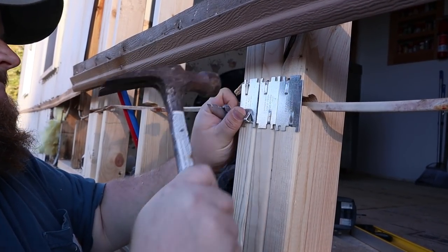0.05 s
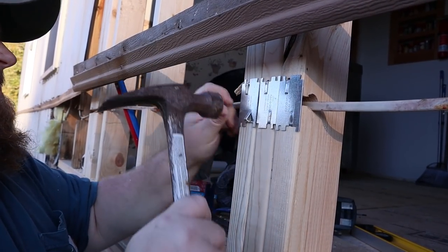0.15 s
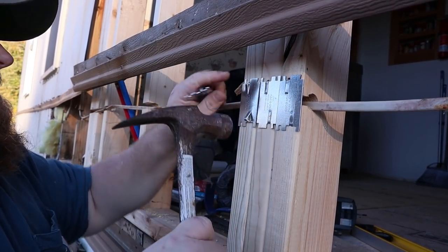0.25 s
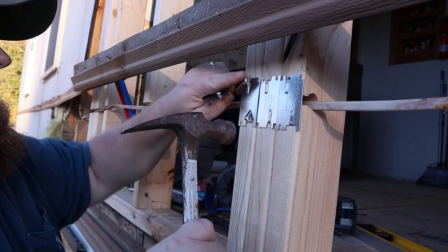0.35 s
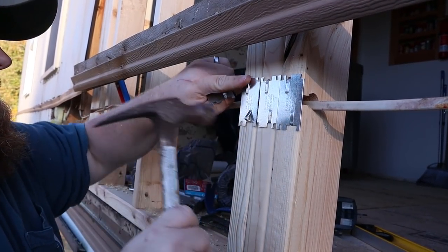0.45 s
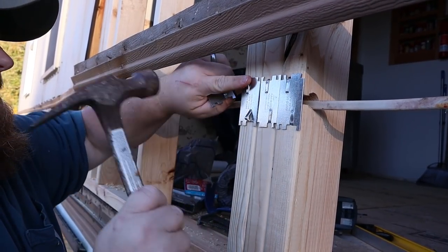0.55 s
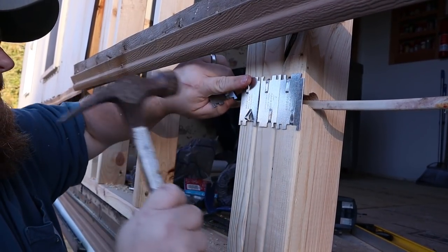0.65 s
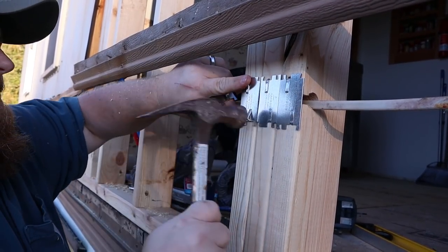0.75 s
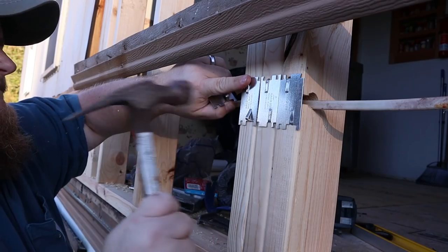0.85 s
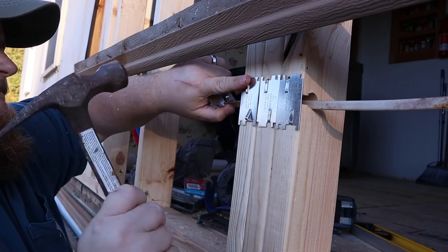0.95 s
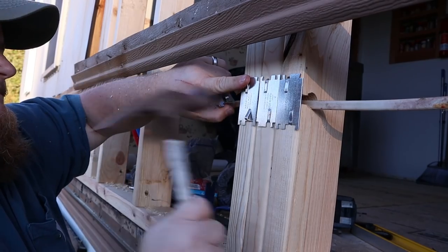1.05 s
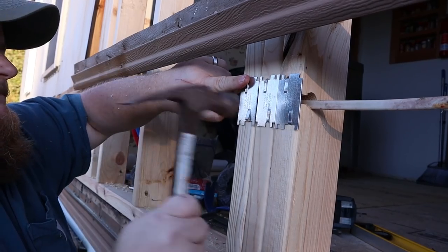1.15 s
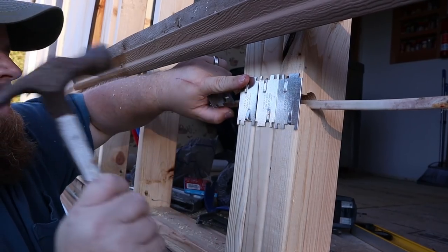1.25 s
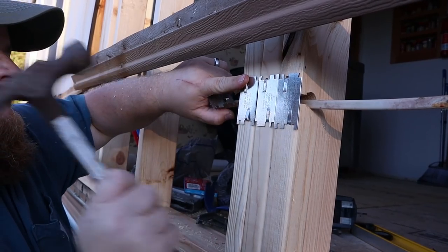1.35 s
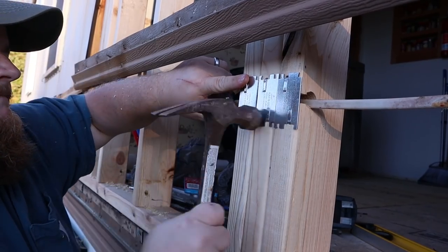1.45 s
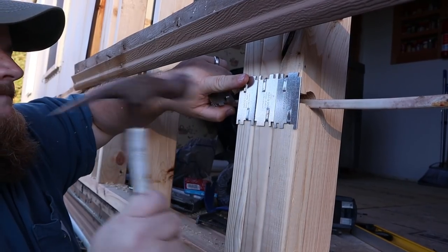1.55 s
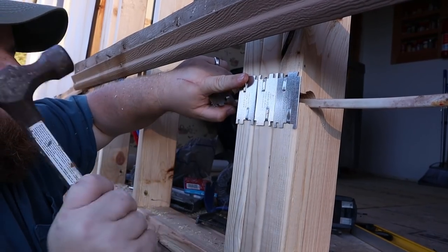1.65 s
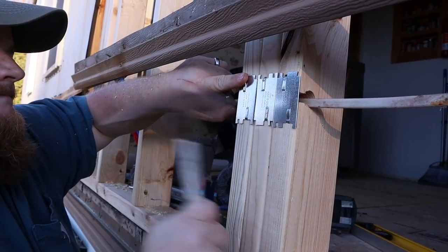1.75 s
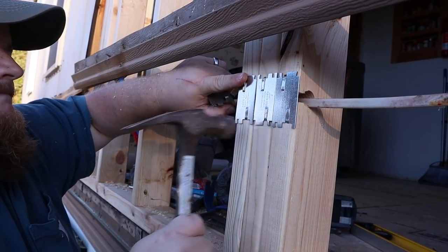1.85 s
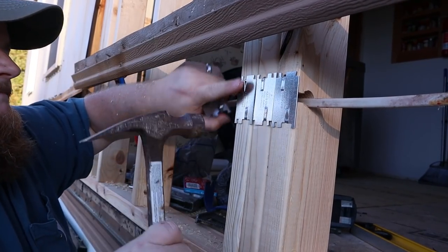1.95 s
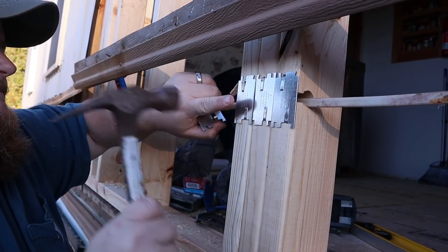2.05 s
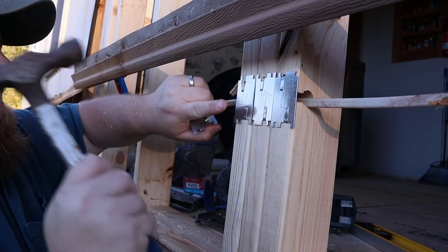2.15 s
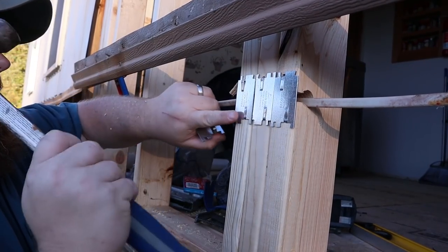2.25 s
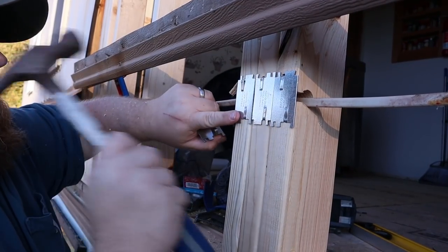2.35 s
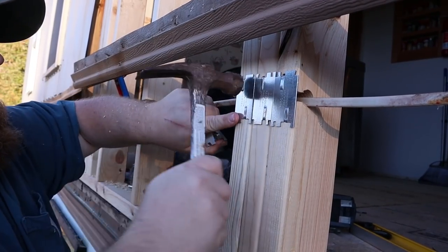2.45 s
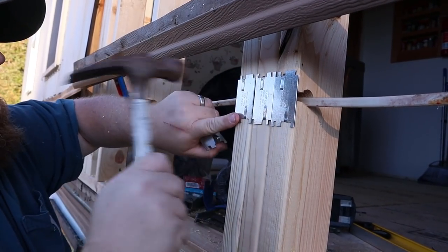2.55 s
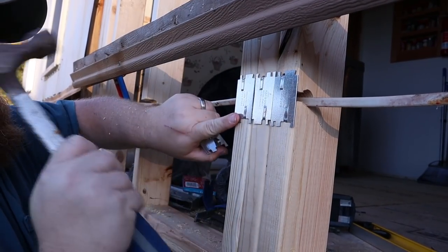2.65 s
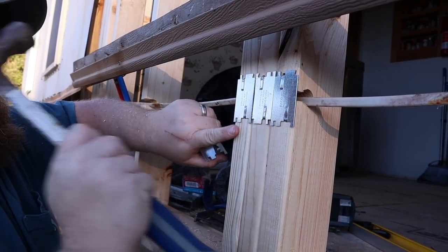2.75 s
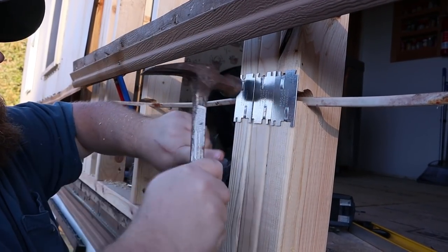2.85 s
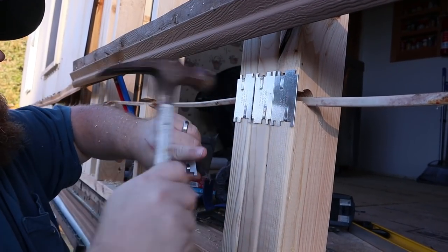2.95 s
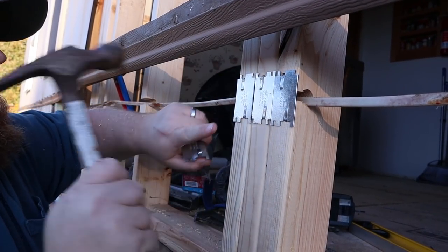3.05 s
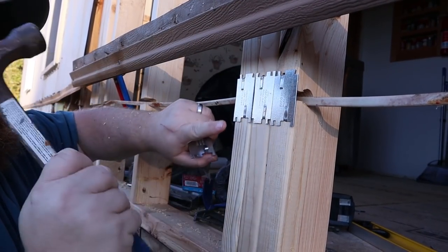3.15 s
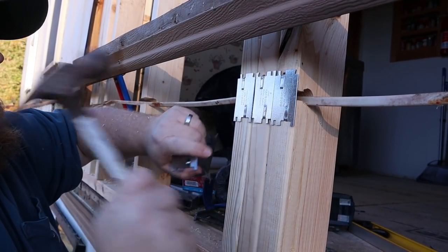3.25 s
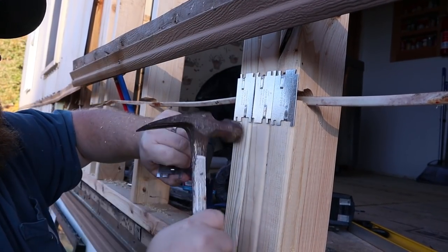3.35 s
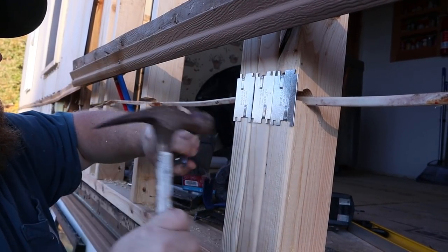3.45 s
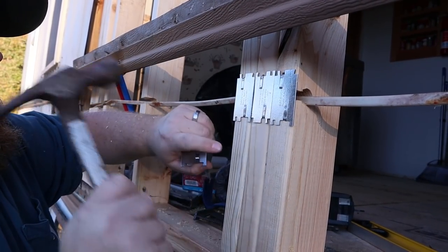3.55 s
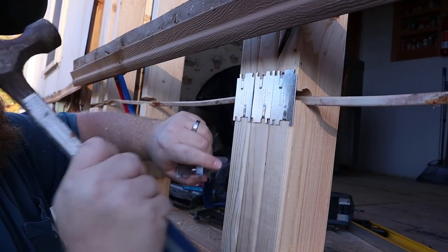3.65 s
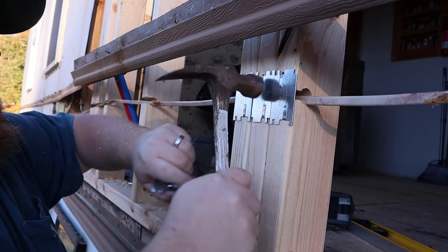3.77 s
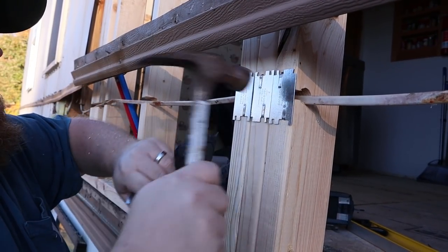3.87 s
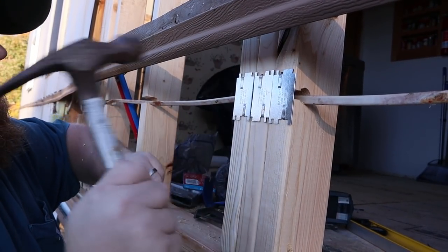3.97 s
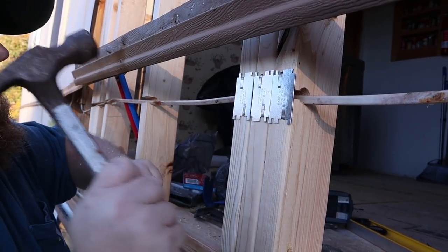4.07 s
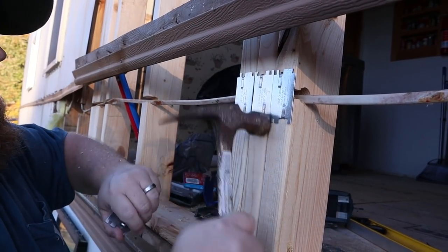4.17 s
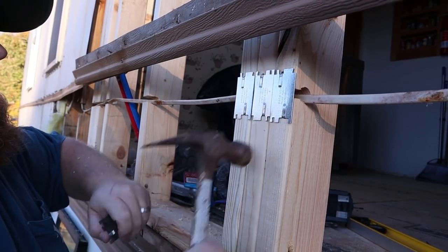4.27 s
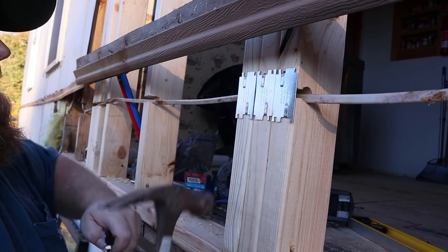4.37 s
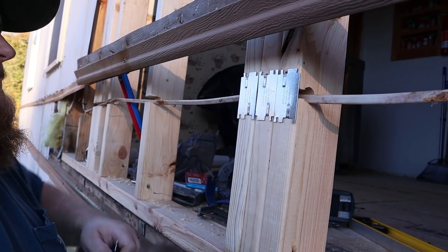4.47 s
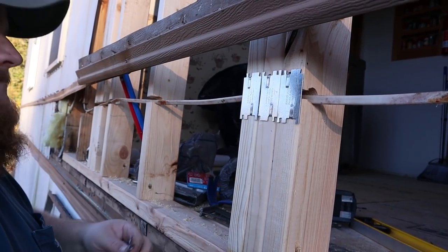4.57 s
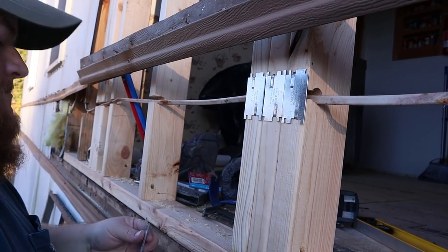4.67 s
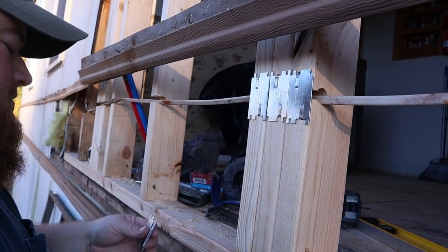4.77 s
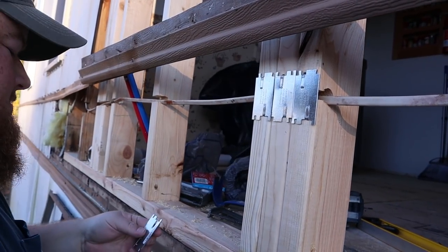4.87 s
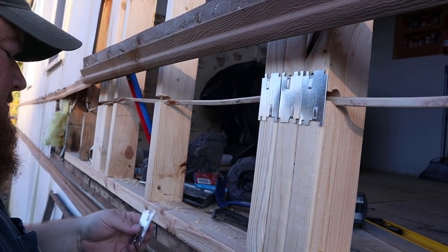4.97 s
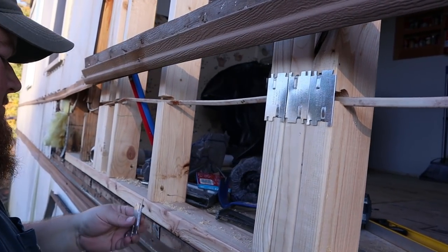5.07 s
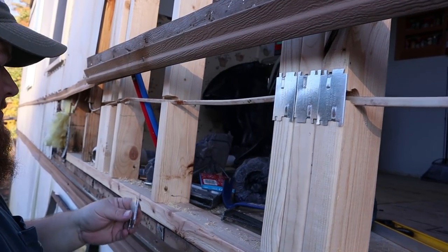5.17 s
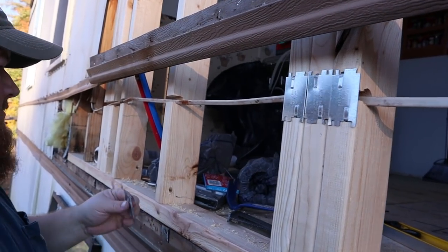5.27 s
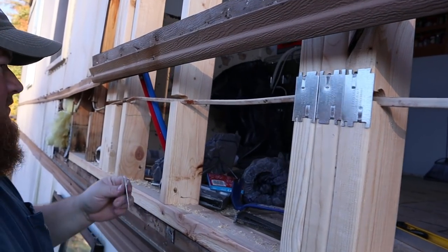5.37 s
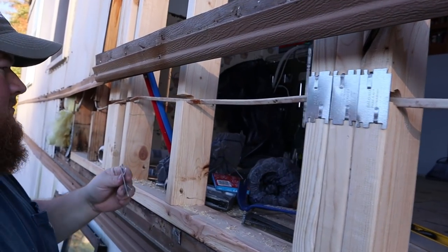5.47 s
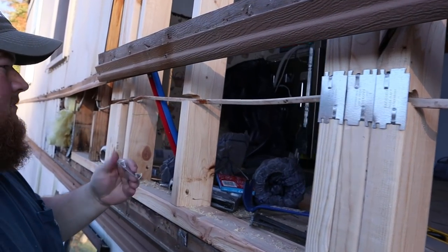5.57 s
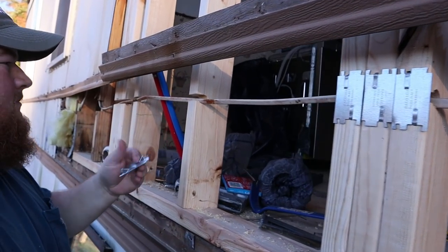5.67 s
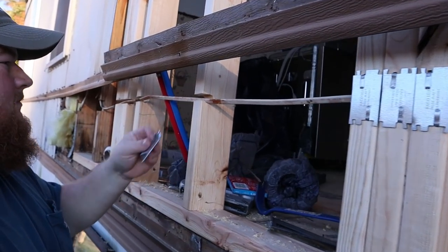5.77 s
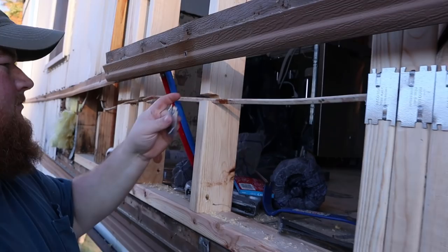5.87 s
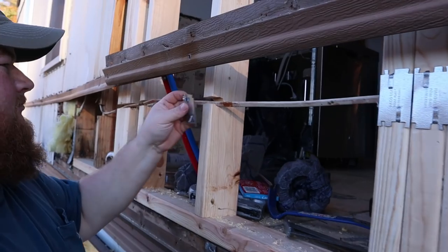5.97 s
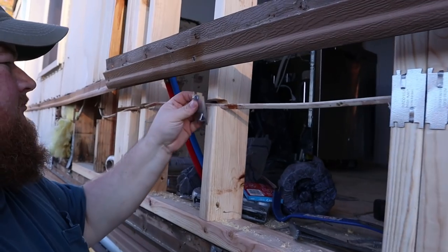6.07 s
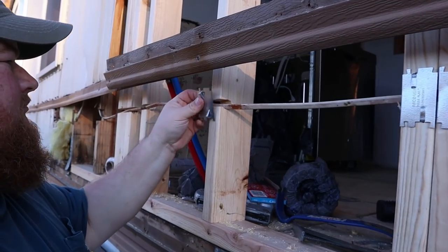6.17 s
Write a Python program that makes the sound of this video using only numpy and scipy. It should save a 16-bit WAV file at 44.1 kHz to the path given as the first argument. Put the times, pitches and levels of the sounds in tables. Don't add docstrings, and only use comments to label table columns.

```python
import sys
import numpy as np
from scipy import signal
from scipy.fft import rfft, irfft, next_fast_len
from scipy.io import wavfile
from scipy.ndimage import map_coordinates

SR = 44100
rng = np.random.default_rng(int(sys.argv[2]) if len(sys.argv) > 2 else 0)


def unload_wav(signal):
    wavfile.write(
        sys.argv[1],
        SR,
        np.round(np.clip(np.atleast_2d(signal).T, -1, 1) * 32767).astype(np.int16),
    )


def voltage_ratio(level):
    return 10 ** (np.asarray(level, float) / 20)


N = 274302

# frequency in Hz, level in dB per Hz.
WIND_SPECTRUM = [(8.8, -29), (15, 3.5), (38, 11), (70, -1.5), (100, -15.5), (150, -120)]
# time in seconds, level in dB.
BREEZE_DB = [(0, -49), (.4, -54), (1.9, -59.5), (2.2, -58.5), (2.8, -52.5), (3.4, -61), (4.2, -63),
             (4.7, -67), (5.4, -56), (5.56, -46.5), (5.8, -49.5), (6.1, -41.5), (6.22, -43)]
# frequency in Hz, level in dB per Hz.
RUMBLE_SPECTRUM = [(29, -42), (50, -18), (70, -1), (108, -5), (134, 1), (260, -11.5), (340, -33),
                   (570, -120)]
# time in seconds, level in dB.
LORRY_DB = [(0, -42), (1, -46), (1.6, -45.5), (2.15, -51.5), (2.5, -50.5), (3.4, -49), (4.3, -47),
            (4.7, -57), (5, -59), (5.4, -58.5), (5.6, -51.5), (5.8, -53), (6.22, -49.5)]
# frequency in Hz, level in dB per Hz.
TRAFFIC_SPECTRUM = [(120, -30), (200, 2), (404, 1.5), (600, -1.5), (1000, -4.5), (1340, -7.5), (1890, -18),
                    (3000, -18), (3900, -49.5), (6600, -120)]
# frequency in Hz, level in dB per Hz.
LEAVES_SPECTRUM = [(880, -25.5), (1500, -1.5), (2320, -4.5), (2640, -5.5), (4690, -9), (6370, -11),
                   (7240, -11), (8080, -13.5), (16000, -25.5)]
TRAFFIC_DB, LEAVES_DB = -55, -58
LEAVES_FOLLOW, TRAFFIC_FOLLOW = 0.36, 0.13
YARD_DB, YARD_T60_S = 15.5, 0.9

# time in seconds, level in dB.
SWARM_DB = [(0, -45), (.2, -45.5), (.3, -60.5), (.9, -66), (1.04, -51), (1.6, -53.5), (3.15, -52.5),
            (3.6, -59.5), (4.35, -60.5), (4.55, -86), (4.88, -82.5), (5.02, -59), (5.25, -63.5),
            (5.39, -78), (6.22, -72.5)]
CRICKET_DB, CRICKET_FOLLOW = -70.5, 0.3
HIGH_CRICKET_DB, HIGH_FADE_DB_PER_S = -72, 2

# first chirp in seconds, last chirp in seconds, first level in dB,
# last level in dB.
INSECT_BOUTS = [(.184, .184, -21, -22), (0.3142, .3422, -28.5, -28.5), (.4275, .4275, -32, -31.5),
                (.543, .572, -32, -40), (.629, .629, -38, -38), (1.0595, 1.0859, -47, -45),
                (1.1278, 1.1594, -39, -35), (1.414, 1.531, -27.5, -36.5), (1.7375, 1.7699, -32, -33),
                (1.831, 1.86, -28, -24), (2.0737, 2.1081, -26.5, -31), (2.1353, 2.2223, -29, -27.5),
                (2.282, 2.34, -33, -36), (2.3989, 2.4907, -37, -45), (2.7277, 2.7277, -30, -27),
                (2.7877, 2.8759, -27.5, -28), (2.915, 2.9427, -46, -36), (3.1546, 3.2475, -27, -30),
                (3.276, 3.3063, -25.5, -27), (3.6576, 3.681, -30.5, -40.5), (3.7783, 3.825, -37, -43),
                (4.1725, 4.201, -34, -36)]
# frequency in Hz, width in Hz, level in dB.
WING_MODES = [(2140, 670, -1), (2650, 220, 0), (3300, 680, -14)]
CHIRP_GAP_S = 0.029

# start in seconds, level in dB, lowest mode in Hz, highest mode in Hz,
# t60 in seconds.
BOARD_KNOCKS = [(0.135, -25, 1210, 2300, 0.034), (.184, -34, 818, 1305, 0.1),
                (2.224, -38.5, 427, 676, 0.12), (4.884, -39, 597, 900, 0.043),
                (5.44, -46.5, 1836, 2100, 0.035), (5.474, -50, 2100, 2255, 0.042),
                (5.698, -33.5, 1000, 2200, 0.013), (5.821, -47, 1847, 2580, 0.039),
                (5.838, -34.5, 900, 1516, 0.052), (5.85, -35, 391, 1550, 0.17),
                (5.935, -47.5, 900, 2360, 0.17), (6.153, -33.5, 455, 730, 0.068),
                (6.21, -40.5, 1420, 2650, 0.046)]
# start in seconds, level in dB, frequency in Hz, t60 in seconds.
PLATE_RINGS = [
    (2.817, -45, 13000, 0.027),
    (2.817, -34, 5080, .03),
    (5.35, -59, 8450, 0.174),
    (5.666, -55, 7470, .2),
    (5.667, -58, 15300, 0.13),
    (5.91, -50, 8360, 0.17),
    (5.921, -66, 12800, 0.14),
    (5.93, -52, 14300, .05),
    (6.21, -51, 12200, .05),
]
# start in seconds, level in dB, centre in Hz, width in Hz,
# t60 in seconds.
STEEL_CLINKS = [(0.025, -9.5, 5000, 3000, 0.017), (0.14, -34, 3550, 3000, 0.018),
                (2.244, -51.5, 9000, 9000, .03), (2.513, -41, 7870, 12100, 0.048),
                (2.818, -48.5, 8980, 10000, 0.027), (2.834, -47.5, 7500, 3000, .03),
                (2.874, -54, 8000, 9000, .03), (4.849, -60, 6970, 9000, 0.0414),
                (4.882, -37, 4000, 4960, 0.02), (4.892, -43, 4460, 6000, 0.02),
                (5.567, -56, 10950, 6000, 0.014), (5.699, -38.5, 3000, 4500, 0.013),
                (5.82, -39, 3300, 2000, 0.022), (5.931, -49.5, 11000, 8000, .03),
                (6.151, -50, 12000, 6000, .02), (6.169, -34.5, 4000, 4000, 0.013),
                (6.211, -43, 9020, 12000, .03)]

# start in seconds, strength in dB, plate seated 0-1, loudest board mode in Hz,
# middle plate mode in Hz.
HAMMER_BLOWS = [
    [(-.008, 1, 0.49, 700, 2300), (0.841, -2, 0.03, 540, 3590), (1.194, -0.5, 0.21, 769, 2853),
     (1.547, 0.5, 0.31, 872, 2550), (1.883, 2.5, 0.49, 687, 2960)],
    [(2.534, 0, 0.46, 1076, 3290), (2.961, 1, 0.54, 1110, 4020), (3.428, 0, 0.55, 564, 3500)],
    [(3.88, 1, 0.56, 1071, 3830), (4.284, -0.5, 0.74, 953, 2680)],
]
# stud level in dB, shed level in dB, stud mode in Hz,
# low plate mode in Hz, high plate mode in Hz.
STRUCK_SPOTS = [
    (2.5, -3, 188, 1480, 7800),
    (3.5, -1.5, 316, 1256, 5670),
    (-1.5, -1, 308, 1700, 4800),
]
# frequency in Hz, width in Hz, level in dB.
STUD_MODES = [(100.9, 37, -6.5), (151, 35.5, 2), (194, 22.4, -0.5), (247, 22, 3), (322, 93.4, -1.5),
              (380, 89.5, -5.5)]
# frequency in Hz, width in Hz, level in dB.
BOARD_MODES = [(520, 473, 5.5), (900, 910, 7), (1376, 256, 6.5), (2100, 1200, -15)]
# frequency in Hz, width in Hz, level in dB.
PLATE_MODES = [(2710, 910, 3.5), (3650, 1500, -0.5), (5520, 1250, 0.5), (8410, 2800, -2.5),
               (13000, 12000, -14.5)]
# frequency in Hz, t60 in seconds.
SHED_T60_S = [(80, 0.71), (150, 0.36), (280, 0.3), (1000, 0.31), (3000, 0.35), (8000, 0.35), (15000, 0.25)]
# frequency in Hz, level in dB.
SHED_COLOUR_DB = [(60, 5.5), (200, 0.5), (600, 4), (2000, -8), (5000, -10.5), (9500, -8), (12000, -18.5),
                  (16000, -12.5)]
PLATE_DB, BOARD_DB, JOLT_DB, LOOSE_DB = (3, -2.5), (-5, 2), (-27.5, -8.5), (8.5, -16)
THUD_DB, CHATTER_T60_S, FAVOURED_DB = (3, -3), (0.022, 0.014), (-4.5, 3)
RING_DB = 6


def unit(x):
    return x / np.sqrt(np.mean(x ** 2) + 1e-20)


def along(points, hz):
    f, v = np.transpose(points)
    return np.interp(np.log(hz + 1), np.log(f + 1), v)


def curve(rows):
    return np.interp(np.arange(N) / SR, *np.transpose(rows))


def wobble(rate):
    knots = rng.standard_normal(int(N * rate / SR) + 4)
    return map_coordinates(knots, [np.arange(N) * rate / SR])


def burst(t, t60):
    return voltage_ratio(-60 * t / t60) * rng.standard_normal(len(t))


def filtered(x, response):
    m = next_fast_len(len(x) + 8192)
    return irfft(rfft(x, m) * response(np.fft.rfftfreq(m, 1 / SR)), m)[:len(x)]


def body(peaks):
    def response(f):
        total = 0
        for k, (c, w, db) in enumerate(peaks):
            total = total + (-1) ** k * voltage_ratio(db) * 1j * f * w / (c * c - f * f + 1j * f * w)
        return total
    return response


def band(hz, width_hz):
    return lambda f: body([(hz, width_hz, 0)])(f) ** 2


def favoured(peaks, peak):
    return lambda f: body(peaks)(f) * (1 + body([peak])(f))


def blurred(peaks):
    return lambda f: np.sqrt(sum(np.abs(body([peak])(f)) ** 2 for peak in peaks))


def add(track, s, x):
    at = round(s * SR)
    x = x[max(-at, 0):N - at]
    track[max(at, 0):][:len(x)] += x


def blow_times():
    return np.array([blow[0] for group in HAMMER_BLOWS for blow in group])[:, None]


def rush(spectrum):
    return unit(filtered(rng.standard_normal(N), lambda hz: voltage_ratio(along(spectrum, hz))))


def air():
    wind_db, rumble_db = curve(BREEZE_DB), curve(LORRY_DB)
    gust_db = wind_db - wind_db.mean()
    since = np.arange(N) / SR - blow_times()
    echoes = 1 + np.sum((since > 0) * voltage_ratio(YARD_DB - 60 * np.abs(since) / YARD_T60_S), axis=0)
    wind = voltage_ratio(wind_db - 4.0 + 2.3 * wobble(14)) * rush(WIND_SPECTRUM)
    rumble = echoes ** 0.31 * voltage_ratio(rumble_db - 2.5 + 2.1 * wobble(9)) * rush(RUMBLE_SPECTRUM)
    traffic = echoes * voltage_ratio(TRAFFIC_DB + TRAFFIC_FOLLOW * gust_db + wobble(6.9)) * rush(TRAFFIC_SPECTRUM)
    leaves_db = LEAVES_DB + LEAVES_FOLLOW * gust_db + 0.32 * wobble(54)
    leaves = echoes ** 0.3 * voltage_ratio(leaves_db) * rush(LEAVES_SPECTRUM)
    return wind + rumble + traffic + leaves


def chorus():
    swarm_db, t = curve(SWARM_DB), np.arange(N) / SR

    def drone(hz, width_hz):
        return unit(filtered(rng.standard_normal(N), band(hz, width_hz)))

    swarm = voltage_ratio(swarm_db - 4.5 + 2.2 * wobble(41)) * drone(2230, 390)
    cricket_db = CRICKET_DB + CRICKET_FOLLOW * (swarm_db - swarm_db.mean())
    cricket = voltage_ratio(cricket_db + 2.2 * wobble(54)) * drone(4840, 530)
    high_db = HIGH_CRICKET_DB - HIGH_FADE_DB_PER_S * t
    high_cricket = voltage_ratio(high_db + 3.9 * wobble(15)) * drone(6100, 400)
    return swarm + cricket + high_cricket


def insect():
    strokes, k = np.zeros(N), np.arange(6)
    chirps = []
    for s, last_s, db, last_db in INSECT_BOUTS:
        count = round((last_s - s) / CHIRP_GAP_S) + 1
        chirps.extend(np.linspace((s, db), (last_s, last_db), count))
    fade_db = 3 * (k - 0.8) ** 2
    for s, db in chirps:
        size, late = rng.standard_normal((2, 6))
        stroke_s = s + 0.001 + 0.0024 * k + 0.0004 * late
        strokes[np.round(stroke_s * SR).astype(int)] += voltage_ratio(db + 22.5 - fade_db + 1.4 * size)
    yard = burst(np.arange(SR // 4) / SR, t60=0.14)
    strokes += voltage_ratio(-8.5) * signal.fftconvolve(strokes, yard / np.linalg.norm(yard))[:N]
    return filtered(filtered(strokes, body(WING_MODES)), band(2410, 2200))


def knocks():
    out, t = np.zeros(N), np.arange(SR // 2) / SR
    for s, db, low_hz, high_hz, t60 in BOARD_KNOCKS:
        modes_hz = np.linspace(low_hz, high_hz, 3)
        ring = np.zeros(len(t))
        for hz in modes_hz:
            drift = 0.065 * np.cumsum(rng.standard_normal(len(t)))
            ring += np.sin(2 * np.pi * hz * t + drift)
        ring *= voltage_ratio(-60 * t / t60) * (1 - np.exp(-t / 0.0009))
        rub = filtered(burst(t, 2 * t60 + 0.04), band(np.mean(modes_hz), 1500))
        add(out, s, voltage_ratio(db - 1) * (ring + 1.1 * rub))
    return out


def rings():
    out, t = np.zeros(N), np.arange(SR // 3) / SR
    for s, db, hz, t60 in PLATE_RINGS:
        slide = burst(t, t60) * (1 - np.exp(-t / 0.0049))
        add(out, s, voltage_ratio(db + 22.5) * filtered(slide, body([(hz, 110, 0)])))
    return out


def clinks():
    out, t = np.zeros(N), np.arange(SR // 4) / SR
    for s, db, hz, width_hz, t60 in STEEL_CLINKS:
        scratch = filtered(burst(t, t60), band(hz, 1.5 * width_hz))
        add(out, s, voltage_ratio(db + 6.5) * scratch * (1 - np.exp(-t / 0.00089)))
    return out


def shed(size, colour):
    hz, t, z = signal.stft(rng.standard_normal(size), SR, nperseg=256)
    decay_db = along(SHED_COLOUR_DB, hz)[:, None] - 60 * t / along(SHED_T60_S, hz)[:, None]
    back_wall = 1 + 0.5 * np.exp(-((t - 0.095) / 0.012) ** 2)
    gain = colour(hz)[:, None] * voltage_ratio(decay_db - 21.0) * (1 - np.exp(-t / 0.013)) * back_wall
    return signal.istft(z * gain, SR, nperseg=256)[1][:size]


def struck_stud(t, thud_db, shed_db, stud_hz):
    thud = voltage_ratio(16.5) * (t == 0) + 0.71 * burst(t, t60=0.056)
    answer = voltage_ratio(shed_db) * shed(len(t), np.ones_like)
    return filtered(voltage_ratio(thud_db) * thud + answer, favoured(STUD_MODES, (stud_hz, 60, -2)))


def struck_boards(t, shed_db, board_hz, favoured_db):
    rattle = voltage_ratio(15) * (t == 0) + 0.45 * burst(t, t60=0.067)
    direct = filtered(rattle, favoured(BOARD_MODES, (board_hz, 300, favoured_db)))
    answer = shed(len(t), blurred(list(BOARD_MODES) + [(board_hz, 300, -2)]))
    return direct + voltage_ratio(shed_db + 0.5) * answer


def struck_plate(t, chatter_t60, loose_db, shed_db):
    chatter = 0.8 * filtered(burst(t, chatter_t60), body(PLATE_MODES))
    rattle = voltage_ratio(loose_db - 16.5) * filtered(burst(t, t60=0.14), body([(2750, 1400, 0.0037)]))
    loose_modes = [(2720, 900, loose_db + 2.5), (2000, 1100, loose_db - 2.5)]
    answer = shed(len(t), blurred(list(PLATE_MODES) + loose_modes))
    return chatter + rattle + voltage_ratio(shed_db + 2.5) * answer


def steel_contact(t, seated, low_hz, middle_hz, high_hz):
    notes = (1.2 - 0.82 * seated) * np.sin(2 * np.pi * middle_hz * t)
    notes += (0.51 + 0.9 * seated) * np.sin(2 * np.pi * low_hz * t)
    notes += 0.8 * np.sin(2 * np.pi * high_hz * t)
    return voltage_ratio(RING_DB - 60 * t / 0.012) * notes + 1.2 * burst(t, t60=0.008)


def hammer():
    out, t = np.zeros(N), np.arange(3 * SR // 4) / SR
    for group, spot in zip(HAMMER_BLOWS, STRUCK_SPOTS):
        stud_db, shed_db, stud_hz, low_hz, high_hz = spot
        for s, db, seated, board_hz, plate_hz in group:
            def now(pair):
                return pair[0] + seated * (pair[1] - pair[0])

            stud = struck_stud(t, now(THUD_DB), shed_db, stud_hz)
            boards = struck_boards(t, shed_db, board_hz, now(FAVOURED_DB))
            plate = struck_plate(t, now(CHATTER_T60_S), now(LOOSE_DB), shed_db)
            contact = steel_contact(t, seated, low_hz, plate_hz, high_hz)
            jolt = -voltage_ratio(now(JOLT_DB) + 12.5) * t / 0.002 * np.exp(-t / 0.0025)
            blow = voltage_ratio(stud_db + 26.5) * stud + voltage_ratio(now(BOARD_DB) + 20.0) * boards
            blow += voltage_ratio(now(PLATE_DB) + 12) * plate + contact + jolt
            add(out, s, voltage_ratio(db) * blow)
    return out


def scene():
    return (air() + chorus() + insect() + knocks() + rings() + clinks() + hammer())[None]


def duck(depth_db, attack_s, release_s):
    since = np.arange(N) / SR - blow_times()
    down = 1 - np.exp(-np.maximum(since, 0) / attack_s)
    return voltage_ratio(-depth_db * np.sum(down * np.clip(1 - since / release_s, 0, 1), axis=0))


def top_cut(x):
    return signal.sosfilt(signal.butter(12, 16400, fs=SR, output="sos"), x)


def record(dry):
    top_hz, ceiling = 15900, 1.07
    x = dry[0] * duck(depth_db=18.0, attack_s=0.0018, release_s=0.11)
    x = filtered(x, lambda hz: voltage_ratio(-30 * np.clip((hz - top_hz) / 500 + 0.5, 0, 1)))
    x = x / (1 + np.abs(x / ceiling) ** 8) ** (1 / 8)
    return top_cut(x[None])


dry = scene()
out = record(dry)
unload_wav(out)
```